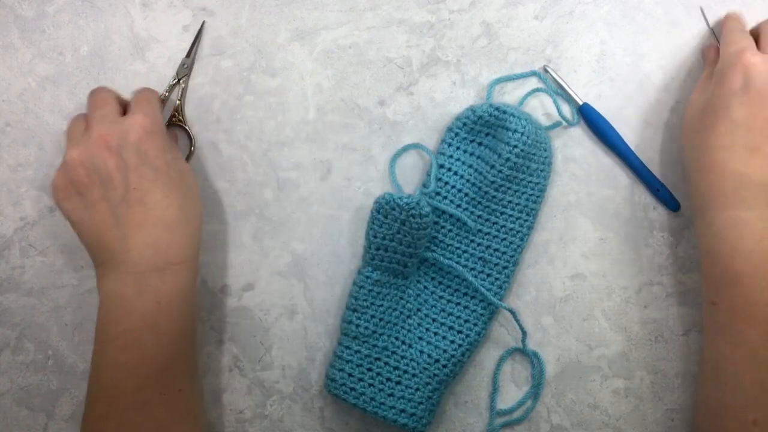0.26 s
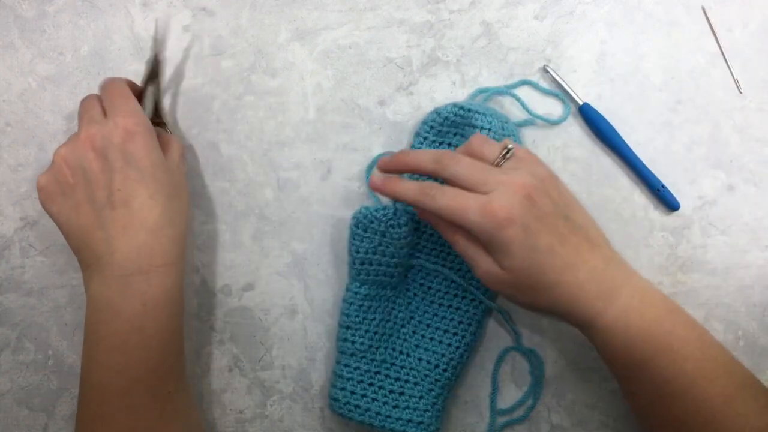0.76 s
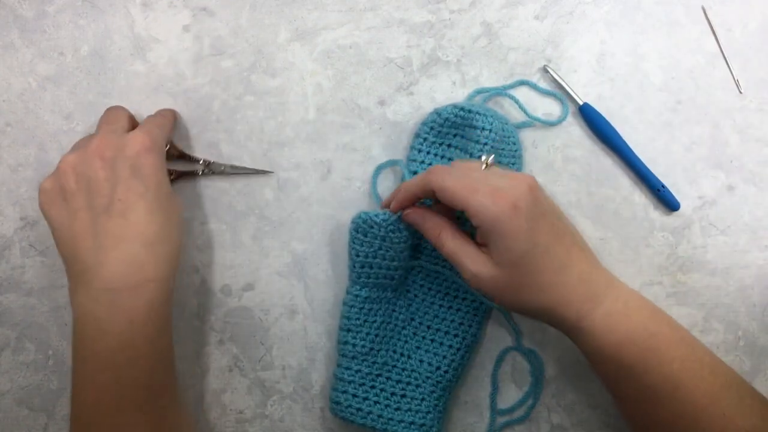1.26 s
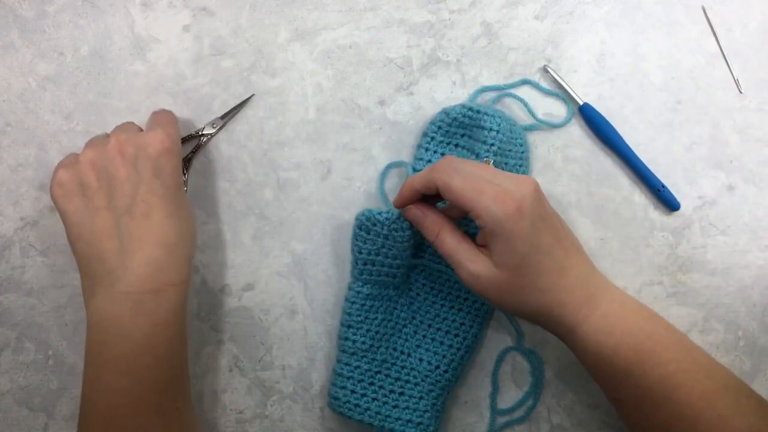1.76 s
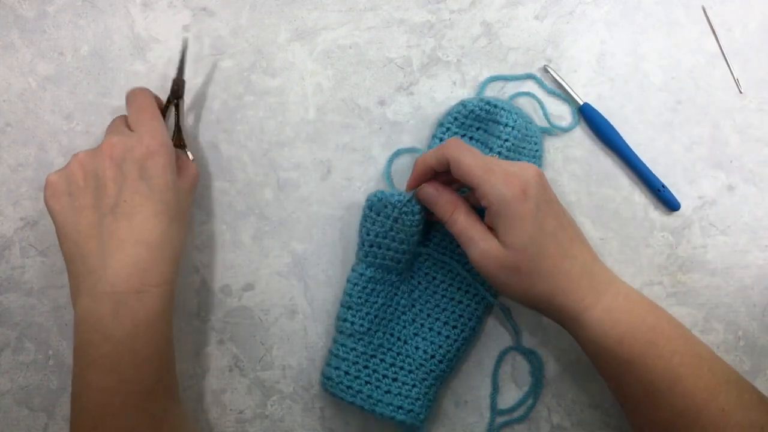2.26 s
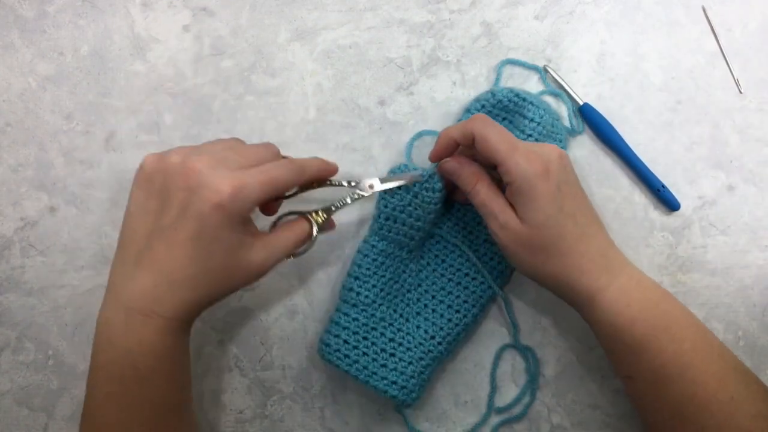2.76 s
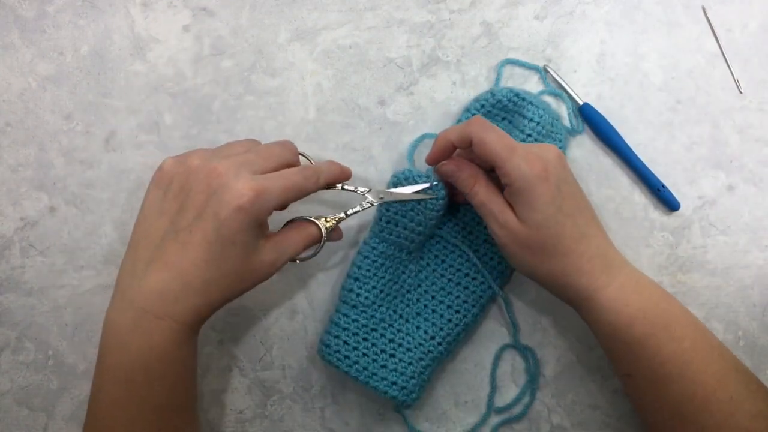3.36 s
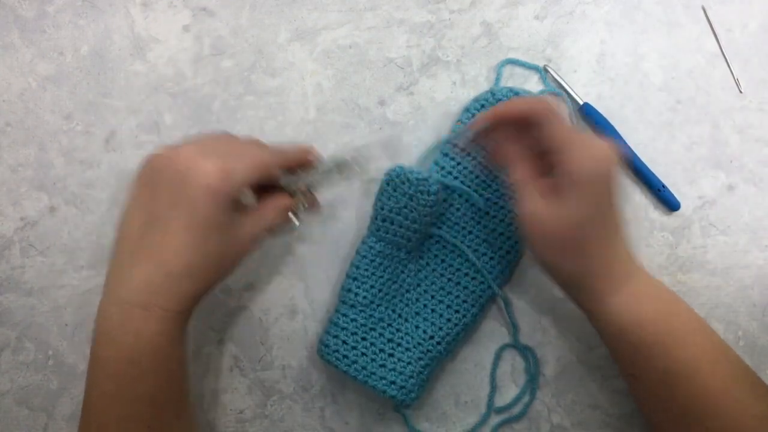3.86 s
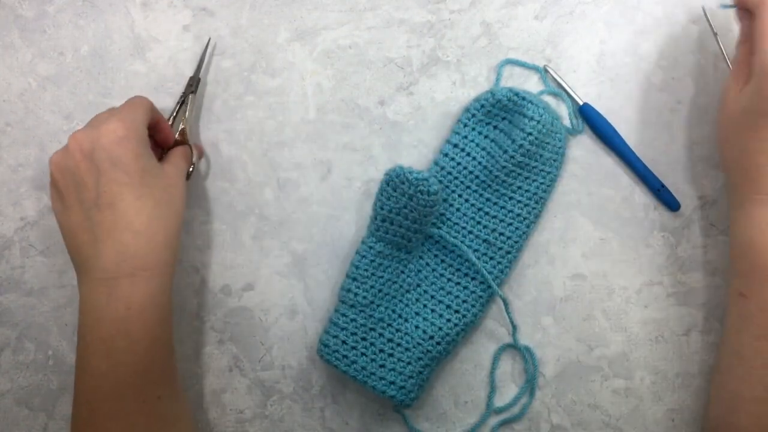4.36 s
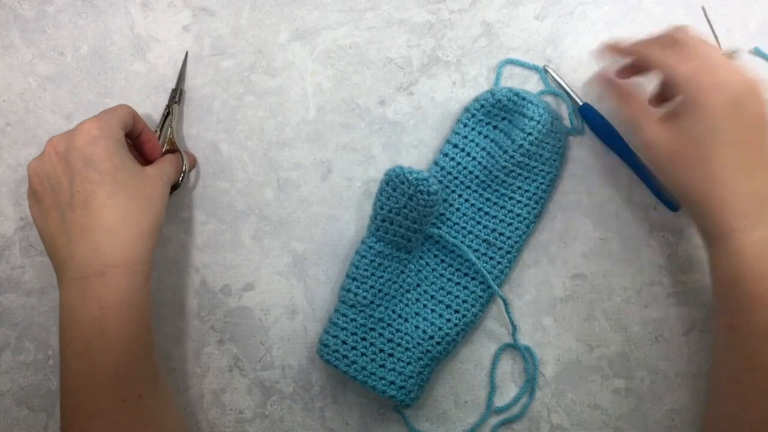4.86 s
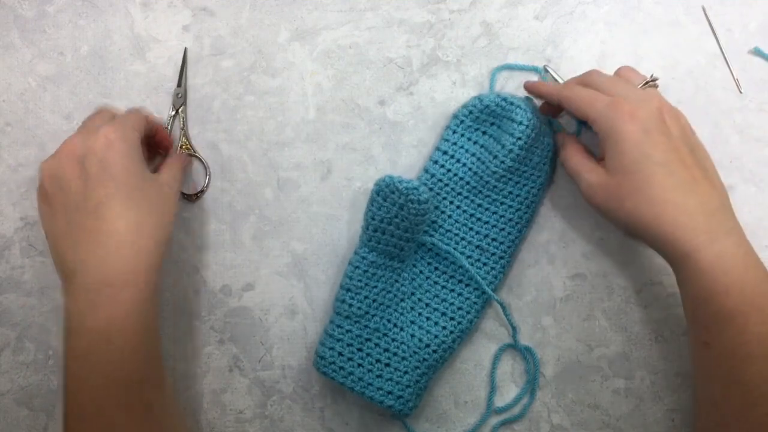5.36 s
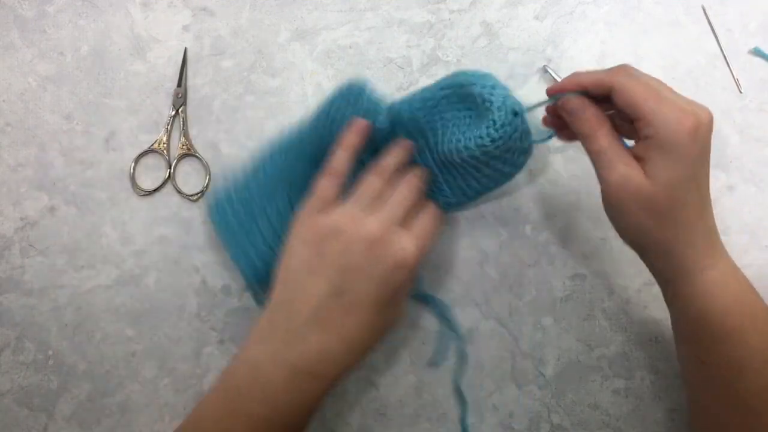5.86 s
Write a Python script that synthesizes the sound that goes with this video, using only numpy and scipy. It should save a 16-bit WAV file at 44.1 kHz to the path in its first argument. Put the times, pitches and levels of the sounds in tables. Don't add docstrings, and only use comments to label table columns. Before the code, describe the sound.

Small steel scissors tap and clack on a hollow-sounding table, snip a strand of yarn once, then finger thumps and a soft knitted rustle follow.

```python
import sys
import numpy as np
from scipy import signal
from scipy.fft import rfft, irfft
from scipy.io import wavfile
from scipy.ndimage import uniform_filter1d

SR = 44100
rng = np.random.default_rng(int(sys.argv[2]) if len(sys.argv) > 2 else 0)


def unload_audio(sound):
    columns = np.transpose(np.atleast_2d(sound))
    steps = np.round(np.clip(columns, -1, 1) * 32767)
    wavfile.write(sys.argv[1], SR, steps.astype(np.int16))


def boost(x):
    u = np.asarray(x, float) / 20
    return 10 ** u


N = 269010

# f/Hz, level/dB, t60/s
TABLE_LOW = [(111.7, -16.5, 0.53), (135, 2.5, 0.16), (197.7, -4, 0.13), (223.8, 2, 0.093),
             (268, -4.5, 0.16), (317, -7, 0.29), (343, -10.5, 0.39)]
# f/Hz, level/dB, t60/s
TABLE_HIGH = [(420, -9, .16), (515, -6, .13), (542, -2, .13), (622, 0, .13), (722, -2, .12), (826, -7, .1),
              (870, -11, .1), (935, -13, .1), (1090, -14, .08), (1230, -15, .09), (1620, -15, .06)]


def evened(x):
    return x / np.sqrt(np.mean(x ** 2) + 1e-20)


def read(points, hz):
    f, value = np.transpose(points)
    return np.interp(np.log(hz + 1), np.log(f + 1), value)


def add(mix, s, sound):
    part = mix[round(s * SR):][:len(sound)]
    part += sound[:len(part)]


def coloured(x, points):
    gain = boost(read(points, np.fft.rfftfreq(len(x), 1 / SR)))
    return evened(irfft(rfft(x) * gain, len(x)))


def band(x, lo_hz, hi_hz, order=3):
    sos = signal.butter(order, [lo_hz, hi_hz], "band", fs=SR, output="sos")
    return evened(signal.sosfilt(sos, x))


def resonate(x, hz, width_hz):
    turn = np.exp(2j * np.pi * np.cumsum(hz * np.ones(len(x))) / SR)
    r = np.exp(-np.pi * width_hz / SR)
    return evened((turn * signal.lfilter([1 - r], [1, -r], x / turn)).real)


def ring(modes, spread_db, rise_s):
    t = np.arange(SR // 4) / SR
    hz, db, t60 = np.transpose(modes)[:, :, None]
    weight, phase, detune = np.clip(rng.standard_normal((3, len(modes), 1)), -1.6, 1.6)
    swing = np.sin(2 * np.pi * hz * (1 + 0.017 * detune) * t + 0.78 * phase)
    swing += 0.6 * np.sin(2 * np.pi * hz * (1.022 + 0.012 * phase) * t + 3 * detune)
    sound = (boost(db + spread_db * weight - 60 * t / t60) * swing).sum(0)
    sound *= (1 - np.exp(-t / rise_s)) * (0.7 + np.exp(-t / 0.021))
    return sound / abs(sound).max()


def grit(size, per_s, spread_db):
    sizes = boost(spread_db * np.minimum(rng.exponential(1, size), 2))
    slips = sizes * (rng.random(size) < per_s / SR)
    return (2.8 + evened(slips)) * rng.standard_normal(size)


def patchy(x, patch_db, flicker_db):
    z = signal.stft(x, nperseg=256)[2]
    patches = uniform_filter1d(rng.standard_normal(z.shape), size=6, axis=0)
    patches = uniform_filter1d(patches, size=7, axis=1)
    catches = uniform_filter1d(rng.standard_normal(z.shape[1]), size=2)
    gain = boost(patch_db * evened(patches) + flicker_db * evened(catches))
    return evened(signal.istft(z * gain, nperseg=256)[1][:N])


def noise_floor():
    # t/s, level/dB
    lean = [(0.0, -50.5), (0.63, -49.5), (1.09, -47.5), (1.85, -53.5), (2.34, -49), (2.58, -54.5),
            (3.62, -52.5), (3.87, -57), (5.16, -48.5), (5.57, -57), (6.1, -46.5)]
    # f/Hz, density level/dB
    hum_spectrum = [(12, -64), (20, 1), (43, -3.5), (97, -2.5), (139, -5), (220, -23), (316, -20),
                    (392, -24.5), (420, -33.5), (500, -24), (650, -79), (1100, -120)]
    # f/Hz, density level/dB
    hiss_spectrum = [(150, 1.5), (250, -2), (331, -4), (506, -7), (683, -5.5), (773, -9), (1180, -7.5),
                     (2900, -13.5), (4130, -13.5), (4920, -19), (5470, -14.5), (10300, -19.5), (13500, -18),
                     (15800, -24), (16900, -52)]
    lumps = evened(signal.resample(rng.standard_normal(90), N))
    level_db = np.interp(np.arange(N) / SR, *np.transpose(lean)) + 2.33
    hum = boost(level_db + 1.3 * lumps) * coloured(rng.standard_normal(N), hum_spectrum)
    return hum + boost(-58.5) * coloured(rng.standard_normal(N), hiss_spectrum)


def room(x):
    # f/Hz, t60/s
    decay = [(300, 0.26), (1500, 0.18), (5000, 0.17), (14000, 0.084)]
    echoes = np.zeros(SR // 2)
    at = np.arange(200, SR // 2 - 20, 20)
    echoes[at + rng.integers(0, 20, len(at))] = rng.choice([-1., 1.], len(at))
    hz, t, z = signal.stft(echoes, SR, nperseg=256)
    tail = signal.istft(z * boost(-60 * t / read(decay, hz)[:, None]), SR, nperseg=256)[1]
    return signal.fftconvolve(x, tail / np.linalg.norm(tail))[:N]


def peel():
    # start t/s, length t/s, f/Hz, width f/Hz, level/dB
    contacts = [
        (5.509, 0.027, 1010, 150, -51),
        (5.516, 0.035, 2150, 500, -55.5),
        (5.53, 0.036, 3900, 600, -50),
        (5.535, 0.04, 5600, 1100, -49),
    ]
    out = np.zeros(N)
    for s, length_s, hz, width_hz, level_db in contacts:
        t = np.arange(0, length_s + 0.06, 1 / SR)
        slips = band(grit(len(t), per_s=460.0, spread_db=1.0), 750, 8900)
        slips = resonate(slips, hz, width_hz)
        envelope = np.minimum(t / 0.0032, 1) * np.exp(-np.maximum(t - length_s, 0) / 0.009)
        add(out, s, boost(level_db) * slips * envelope)
    return out


def thumps():
    # t/s, boom level/dB, knock level/dB, yielding table f/Hz
    pads = [(0.067, -37, -57, 123), (0.301, -58, -38, 150), (0.56, -39.5, -54, 160),
            (0.734, -37.5, -35, 106), (1.422, -31.5, -45.5, 126), (1.879, -46.5, -54, 114),
            (1.961, -37, -52, 137), (2.456, -36, -48, 280), (2.687, -45, -69, 84), (5.025, -42, -60, 99),
            (5.639, -52, -71, 263), (5.729, -32.5, -46, 182), (5.747, -38.5, -37, 132),
            (5.796, -30.5, -66, 164), (5.861, -33.5, -67, 135), (5.913, -37, -61, 218),
            (5.929, -25, -27, 205), (5.936, -21, -37, 309), (5.948, -30.5, -33, 89), (6.012, -33, -51, 135),
            (6.063, -43, -63, 99)]
    push_s = 0.0031
    table, t = np.zeros(N), np.arange(SR // 8) / SR
    for s, boom_db, knock_db, give_hz in pads:
        turns = give_hz * (t + 0.0028 * (1 - np.exp(-t / 0.015)))
        give = np.sin(2 * np.pi * turns) * (1 - np.exp(-t / 0.006)) * np.exp(-(t * give_hz / 3) ** 2)
        slap = band(rng.standard_normal(len(t)), 300, 1100, order=1)
        slap *= boost(-60 * t / 0.035) * (1 - np.exp(-t / 0.0045))
        knuckle = np.sin(2 * np.pi * t / push_s) * np.exp(-(t / push_s) ** 2)
        add(table, s, boost(boom_db + 4) * give)
        add(table, s, boost(boom_db - 5.0) * ring(TABLE_LOW, spread_db=2.0, rise_s=0.005))
        add(table, s, boost(knock_db - 5) * slap)
        add(table, s, boost(knock_db + 4) * knuckle)
    return table


def strokes():
    # f/Hz, density level/dB
    brush_spectrum = [(1180, -63), (2000, -2), (2880, -6), (3160, -0.5), (3440, -1.5), (3990, -2.5),
                      (5420, -3), (6300, -1), (9500, -9), (12400, -109), (20900, -120)]
    # start t/s, pressing in t/s, letting go t/s, top pressure level/dB, rub f/Hz
    scuffs = [(0.328, 0.002, 0.037, -41.5, 4490), (0.867, 0.0069, 0.03, -41, 4010),
              (0.957, 0.023, 0.011, -36.5, 5530), (0.986, 0.0067, 0.026, -41, 5730),
              (1.629, 0.007, 0.048, -47, 3950), (1.982, 0.0097, 0.035, -31, 5000),
              (1.992, 0.011, 0.011, -32.5, 4850), (2.018, 0.022, 0.056, -57, 5050),
              (2.086, 0.025, 0.016, -43, 4870), (2.452, 0.026, 0.014, -39.5, 5800),
              (4.418, 0.019, 0.056, -55.5, 3560), (4.963, 0.002, 0.054, -53, 4750)]
    # start t/s, pressing in t/s, letting go t/s, top pressure level/dB, rub f/Hz
    brushes = [
        (0.0, 0.051, 0.06, -56, 3780),
        (0.17, 0.072, 0.053, -55.5, 4550),
        (0.402, 0.078, 0.003, -51.5, 4600),
        (0.53, 0.13, 0.033, -52.5, 4370),
        (1.375, 0.11, 0.019, -43.5, 4800),
        (2.62, 0.12, 0.1, -58, 4330),
        (3.96, 0.23, 0.0031, -59.5, 4300),
        (5.09, 0.1, 0.057, -57, 5200),
        (5.53, 0.033, 0.023, -49.5, 4500),
    ]
    # start t/s, first easing t/s, letting go t/s, pressure
    # level between the two/dB, rub f/Hz
    drags = [(1.288, 0.003, 0.069, -46.5, 3700), (1.752, 0.006, 0.0066, -50, 2400),
             (2.235, 0.053, 0.042, -52.5, 3700), (2.452, 0.014, 0.048, -55, 2000),
             (0.545, 0.017, 0.026, -64, 8400), (2.345, 0.033, 0.036, -51.5, 3600),
             (0.299, 0.004, 0.017, -47, 3700), (4.03, 0.155, 0.004, -72, 4300),
             (0.185, 0.03, 0.039, -65.5, 3600)]
    # start t/s, pressing in t/s, letting go t/s, top pressure level/dB, rub f/Hz
    fabric_turns = [
        (5.75, 0.18, 0.72, -51, 6000),
    ]
    # pressure at start level/dB, at end level/dB, shine level/dB, table drag level/dB
    kinds = [(scuffs, (-11, -30.5, -12, -14)),
             (brushes, (-6, -10, -7, -9.5)),
             (drags, (4, -11.5, -9, 5.5)),
             (fabric_turns, (-9, -5, -5.5, -12.5))]
    drag_stays = 0.4

    slips = patchy(grit(N, per_s=1800., spread_db=3.5), patch_db=1.5, flicker_db=-0.5)
    body, shine = coloured(slips, brush_spectrum), band(slips, 7000, 14600)
    top = ring(TABLE_HIGH, spread_db=1, rise_s=0.001)
    top = top + 0.9 * ring(TABLE_LOW, spread_db=1, rise_s=0.002)
    drag = band(slips, 495, 2320, order=2) + 1.34 * evened(signal.oaconvolve(slips, top)[:N])
    out = np.zeros(N)
    for rows, (start_db, end_db, shine_db, drag_db) in kinds:
        for s, rise_s, fall_s, top_db, rub_hz in rows:
            at = np.arange(round(s * SR), min(round((s + rise_s + fall_s + 0.016) * SR), N))
            slack_db = np.interp(at / SR - s, [0, rise_s, rise_s + fall_s], [start_db, 0, end_db])
            rub = 0.67 * body[at] + 0.49 * resonate(body[at], rub_hz, 1700.0)
            layers = rub + boost(shine_db) * shine[at]
            layers += boost(drag_db + 0.5 - drag_stays * slack_db) * drag[at]
            touch, lift = (at - at[0]) / (0.01 * SR), (at[-1] + 300 - at) / (0.015 * SR)
            edge = np.minimum(1, np.minimum(touch, lift))
            out[at] += boost(top_db + slack_db) * layers * edge
    return out


def snip():
    # t/s, pressure level/dB
    shear = [
        (3.775, -62),
        (3.7845, -23),
        (3.787, -30),
        (3.7879, -17),
        (3.7915, -24),
        (3.795, -40),
        (3.805, -53),
        (3.82, -52),
        (3.85, -64),
    ]
    # f/Hz, width f/Hz, level/dB
    blade_modes = [(1860, 440, -26), (3500, 210, 0), (4600, 530, -5), (7600, 2600, -10), (9400, 1400, -3.5),
                   (11100, 760, -3), (12300, 380, -9), (13400, 750, -13), (14900, 810, -17)]
    shut_s = 3.7875
    s, press_db = np.transpose(shear)
    t = np.arange(s[0], s[-1], 1 / SR)
    hz = np.fft.rfftfreq(len(t), 1 / SR)
    blades = boost(-12) + sum(boost(db) / (1 + 2j * (hz - f) / w) for f, w, db in blade_modes)
    slips = grit(len(t), per_s=13000, spread_db=-12)
    grind = irfft(rfft(slips) * blades * hz / (hz + 1500), len(t))
    edge = band(grind, 11500, 15000, order=2)
    whole_db = -2.0 + np.where(t < shut_s, -10, -3)
    whole = boost(whole_db) * band(grind, 450, 8800)
    out = np.zeros(N)
    add(out, s[0], boost(np.interp(t, s, press_db)) * (edge + whole))
    return out


def taps():
    # t/s, tick peak level/dB, table blow level/dB, touching steel f/Hz
    drops = [(0.857, -22, -23.5, 4270), (0.9249, -18.5, -19.5, 5250), (1.0472, -49, -31, 5370),
             (1.0854, -37.5, -52, 4500), (1.2157, -19.5, -24.5, 5530), (1.2509, -8.5, -17, 2070),
             (1.2712, -29, -30.5, 2160), (1.5461, -35, -35, 6160), (2.2131, -26, -24.5, 4280),
             (2.4718, -35.5, -44.5, 5300), (5.2813, -12.5, -19.5, 4210), (5.2918, -34, -31, 2220),
             (5.3103, -24.5, -29, 2100), (5.3339, -25.5, -32, 1890)]
    # t/s, tick peak level/dB, table blow level/dB, touching steel f/Hz
    tips = [(0.1292, -25.5, -41, 4800), (0.4682, -31.5, -41.5, 3080), (1.0004, -36, -44, 2980),
            (1.0367, -14, -20.5, 4720), (1.141, -25, -29.5, 5150), (1.2404, -34, -24.5, 5370),
            (2.3262, -33.5, -37, 1890), (3.061, -45.5, -58, 3870), (3.1393, -49, -57, 4370),
            (4.6683, -42, -54, 3040)]
    # t/s, tick peak level/dB, table blow level/dB, touching steel f/Hz
    held = [(0.1462, -30.5, -56, 4300), (0.2332, -41, -40, 6000), (0.3005, -18.5, -36, 3580),
            (0.3225, -25.5, -56, 3950), (0.8731, -28, -38, 3100), (1.2601, -34, -27.5, 1970),
            (1.5833, -49, -64, 5630), (1.701, -35, -32, 4440), (1.7607, -47, -33, 3500),
            (1.98, -26.5, -36, 5430), (2.0347, -34.5, -39.5, 5670), (2.0507, -40, -39, 5630),
            (4.8357, -47, -75, 6000), (4.9482, -33.5, -33.5, 6600), (5.2621, -37, -34.5, 5200)]
    # f/Hz, level/dB, t60/s
    steel_modes = [(1760, -24, 0.12), (2080, -0.5, 0.007), (3190, -40, 0.0067), (4600, 0, 0.0038),
                   (5625, -3.5, 0.01), (6720, -1.5, 0.0048), (9900, -9, 0.016)]
    # f/Hz, density level/dB
    tick_spectrum = [(710, -34), (1200, -32), (1650, -11), (3010, -11), (4380, -5), (7910, -15),
                     (13000, -41), (15300, -35), (16500, -37)]
    # shine above 11 kHz level/dB, upper table modes against the lower ones level/dB
    kinds = [(drops, (-9.5, 0.67)), (tips, (-6.5, -3.5)), (held, (-16.5, -14))]
    ring_cycles = 56

    steel, table, t = np.zeros(N), np.zeros(N), np.arange(4096) / SR
    for rows, (shine_db, upper_db) in kinds:
        for s, tick_db, boom_db, steel_hz in rows:
            knock_db = boom_db + upper_db
            noise = coloured(rng.standard_normal(len(t)), tick_spectrum)
            crack = band(noise, 1130, 13500) + 0.55 * resonate(noise, steel_hz, 1200.0)
            crack += boost(shine_db + 7.5) * band(noise, 10880, 17060)
            envelope = boost(-60 * t / 0.012) + boost(-16.0 - 60 * t / 0.025)
            envelope *= 1 - np.exp(-t / 0.00015)
            clack = band(rng.standard_normal(len(t)), 1220, 2430, order=2)
            clack *= boost(-60 * t / 0.04) + boost(-11 - 60 * t / 0.13)
            contact_decay = boost(tick_db - 9 - 60 * t * steel_hz / ring_cycles)
            add(steel, s, boost(tick_db - 7.5) * crack * envelope)
            add(steel, s, boost(tick_db - 4) * ring(steel_modes, spread_db=4, rise_s=0.0002))
            add(steel, s, contact_decay * np.sin(2 * np.pi * steel_hz * t))
            add(steel, s, boost((tick_db + knock_db) / 2 - 17.5) * clack)
            add(table, s, boost(knock_db + 3) * ring(TABLE_HIGH, spread_db=1.5, rise_s=0.0012))
            add(table, s, boost(boom_db + 3) * ring(TABLE_LOW, spread_db=2, rise_s=0.004))
    return steel, table


def scene():
    steel, table = taps()
    air = steel + strokes() + peel() + snip()
    reverberant = boost(-14) * room(air) + boost(-11.0) * room(table)
    return (air + table + reverberant + thumps() + noise_floor())[None]


def low_pass(x):
    return signal.sosfilt(signal.butter(12, 17070, fs=SR, output="sos"), x)


def record(dry):
    power_db = 10 * np.log10(abs(uniform_filter1d(dry[0] ** 2, 440)) + 1e-12)
    fall = np.arange(N) * 33.7 / SR
    held_db = np.maximum.accumulate(np.minimum(power_db, -24) + fall) - fall
    over_db = np.maximum(held_db + 33.5, 0)
    late_db = signal.lfilter([0.0012], [1, -(1 - 0.0012)], over_db)
    limited = 0.42 * np.tanh(dry / boost(0.45 * late_db) / 0.42)
    return low_pass(limited)


dry = scene()
out = record(dry)
unload_audio(out)
```